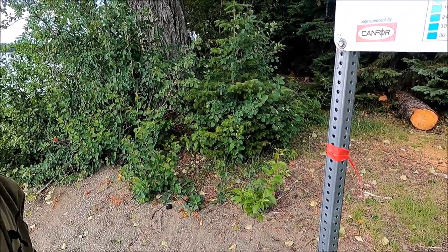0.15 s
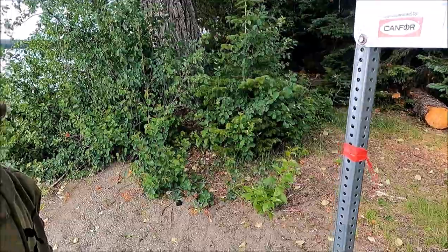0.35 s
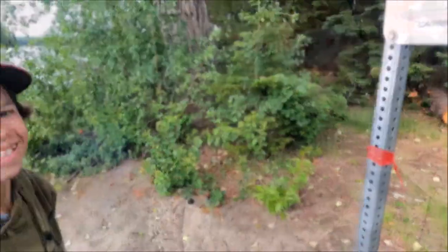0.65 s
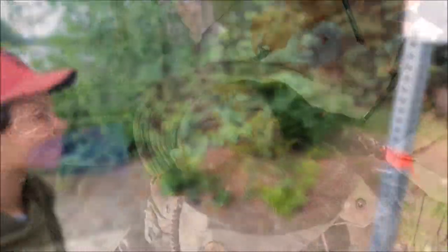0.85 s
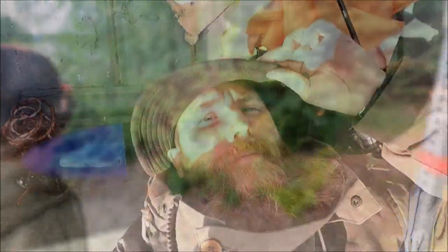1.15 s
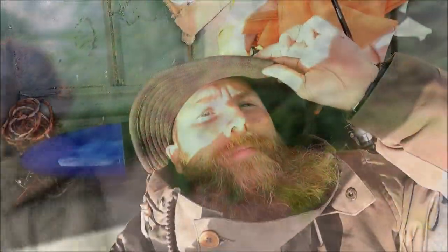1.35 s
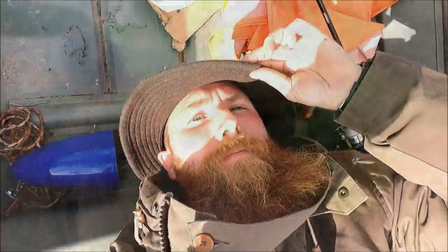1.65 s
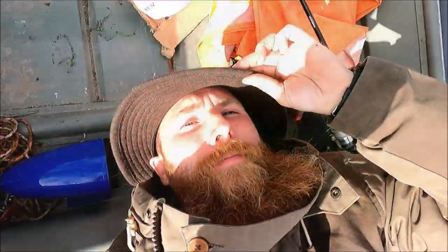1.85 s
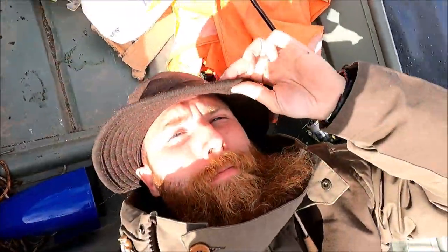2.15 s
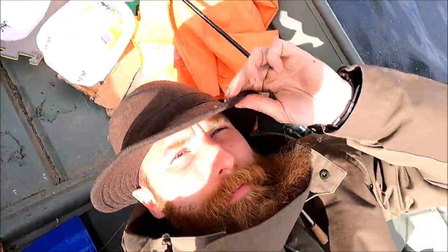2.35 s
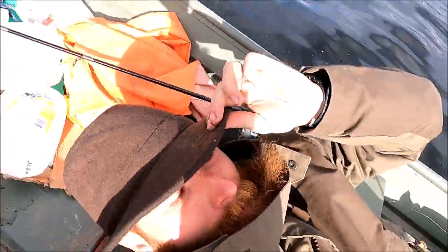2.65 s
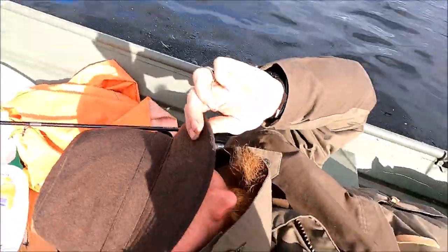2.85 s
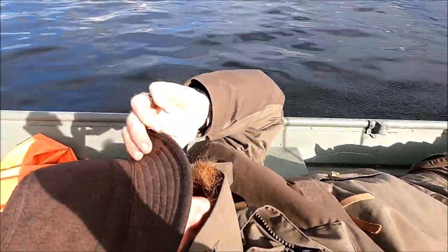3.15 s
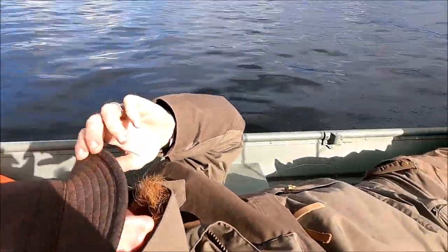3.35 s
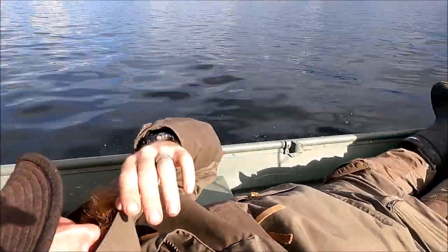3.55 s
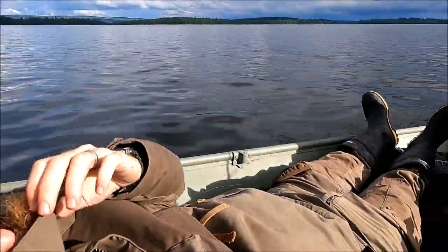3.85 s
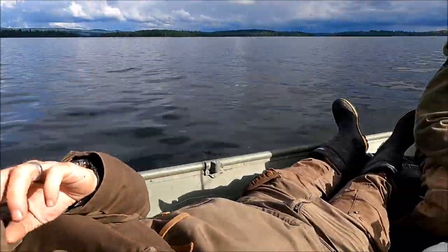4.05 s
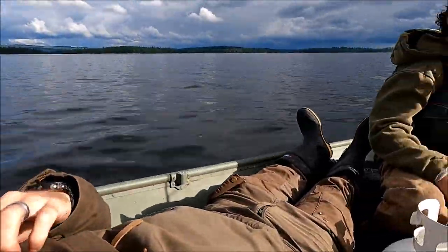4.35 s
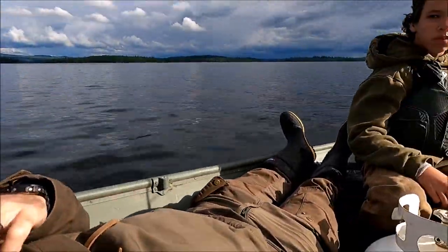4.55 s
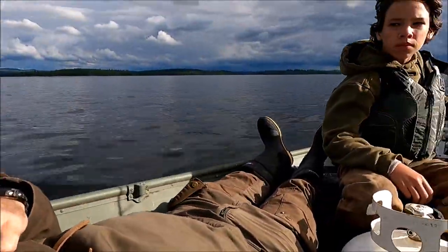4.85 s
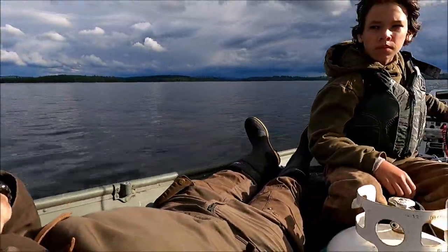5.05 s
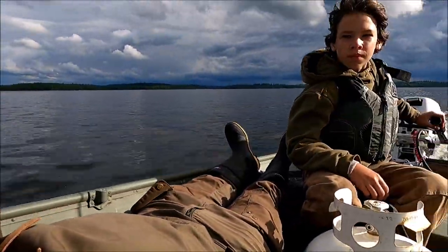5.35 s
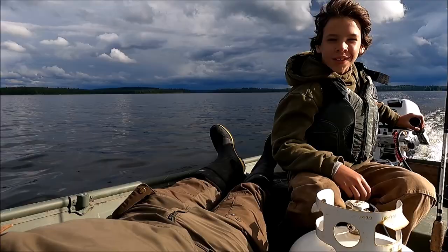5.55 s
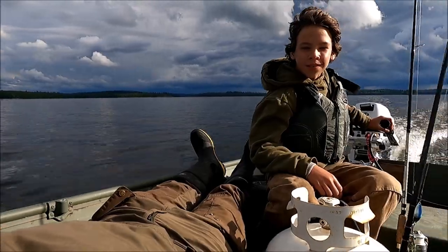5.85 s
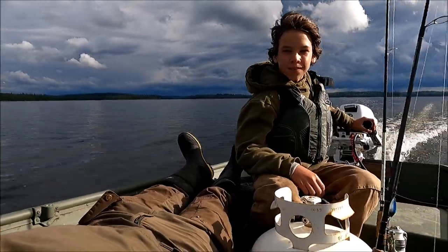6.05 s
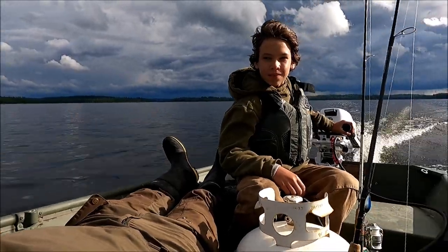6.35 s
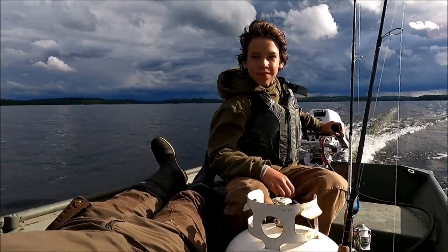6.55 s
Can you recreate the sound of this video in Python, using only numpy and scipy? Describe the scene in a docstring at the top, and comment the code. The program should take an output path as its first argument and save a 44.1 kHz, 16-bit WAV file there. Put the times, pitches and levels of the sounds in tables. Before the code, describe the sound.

A small outboard motor fades in after a brief, quiet moment of leaf rustle and light scuffs. Heard from aboard a metal boat on a lake, it drones at a steady pitch with fast ticking, swelling as the microphone swings round to the stern. Beneath it run a foamy wash, occasional hollow slaps on the hull and light spray, while low gusts buffet the microphone more often in the second half.

```python
"""Faint air in leaves and a few scuffs on a wooded shore give way to a ride in a small metal boat.
A single-cylinder four-stroke outboard holds its speed: each firing thumps, the hull drones, and
valves and gears clatter, all swelling as the microphone turns to face the motor.
Foam and bubbles wash along the side, wavelets slap the hull, spray patters on to the lake
and wind bumps the microphone."""
import sys
import numpy as np
from scipy import signal
from scipy.fft import rfft, irfft
from scipy.io import wavfile

SR = 44100
rng = np.random.default_rng(int(sys.argv[2]) if len(sys.argv) > 2 else 0)


def dump(signal):
    """Clip the signal to [-1, 1] and save it as 16-bit WAV at the path in sys.argv[1]."""
    limited = np.clip(np.atleast_2d(signal).T, -1, 1)
    pcm = np.round(limited * 32767).astype(np.int16)
    wavfile.write(sys.argv[1], SR, pcm)


N = 295818
TIME = np.arange(N) / SR

# Each row: time in seconds, firings per second. The throttle is held; the speed hunts a little.
FIRING_RATE = [(1, 41.93), (2, 41.95), (3, 42.0), (4, 41.96), (4.7, 41.91), (5.7, 41.9), (6.15, 41.84),
               (6.7, 41.91)]
# Each row: time in seconds, microphone heading
# (0 down into the boat, 1 over the side, 2 at the motor, 3 and up across the stern).
MIC_HEADING = [(1.5, 0), (2.4, 0.36), (3.3, 1.0), (3.9, 1.41), (4.6, 1.72), (5.2, 2), (5.6, 3), (6.1, 2.5),
               (6.71, 6.5)]
LOUDEST_HEADING = 2.29


def motor(base_db=-28, db_per_heading=2.5, exhaust_db=0.6, hull_db=-7.3, clatter_db=-27):
    """Exhaust note, hull drone and clatter; all swell as the microphone turns to the motor."""
    cycles = np.cumsum(curve(FIRING_RATE)) / SR + 0.0012 * drift(8.9)  # slight timing jitter
    heading = curve(MIC_HEADING)
    facing = np.minimum(heading, LOUDEST_HEADING)
    drone = hull_drone() * amp(hull_db + drift(3.5))
    metal = clatter(cycles, heading) * amp(clatter_db + (facing - 1.5) + drift(9))
    thumps = exhaust(cycles, heading) * amp(exhaust_db)
    return amp(base_db + db_per_heading * facing) * (thumps + drone + metal)


# Each row: multiple of the firing rate, then relative level in dB at headings 0, 1, 2 and 3.
EXHAUST_PARTIALS = [(1, -35, -35, -20, -18), (2, -7.5, -8, -3.5, -6.5), (3, -16.5, -11, -9, -7.5),
                    (4, -21, -20.5, -12.5, -11.5), (5, -10.5, -16, -12.5, -13), (6, -15, -13, -15.5, -16),
                    (7, -26.5, -16.5, -12, -9.5), (8, -18.5, -21.5, -8, -11), (9, -18.5, -23.5, -14, -17.5),
                    (10, -21.5, -15, -26, -20), (11, -29.5, -17, -41.5, -30.5),
                    (12, -34, -29, -37.5, -32.5), (13, -26, -27, -22.5, -19), (14, -22, -23, -20, -22),
                    (15, -32, -54.5, -38.5, -33.5), (16, -26.5, -50.5, -35.5, -26),
                    (17, -41.5, -64.5, -39.5, -38.5), (18, -54, -47, -29, -30.5),
                    (19, -25, -32.5, -33, -37), (20, -52.5, -45, -37.5, -43.5),
                    (25, -50, -28.5, -52, -51.5), (26, -31.5, -30, -28, -25),
                    (27, -30.5, -45.5, -36.5, -29.5), (28, -38, -30, -46, -45.5),
                    (29, -31, -46, -45.5, -51), (30, -38, -56, -30, -34.5), (31, -31, -42, -43, -34.5),
                    (32, -35, -37, -48, -35.5), (33, -34.5, -69.5, -51, -52), (48, -47, -59, -45.5, -51)]


def exhaust(cycles, heading, waver_db=0.8, waver_rad=0.07, spread_rad=0.04):
    """One thump per firing; the share of each partial depends on where the microphone points."""
    multiples, *views = np.transpose(EXHAUST_PARTIALS)
    orders = np.arange(1, 49)
    levels_db = np.array([np.interp(orders, multiples, view) for view in views])
    phases = panel_lag(orders * curve(FIRING_RATE).mean())
    phases -= spread_rad * orders ** 2  # the hull draws each thump out in time
    phases += (orders > 14) * 2 * np.pi * rng.random(len(orders))  # reflections scramble high partials
    note = np.zeros(N)
    for order, view_db, phase in zip(orders, levels_db.T, phases):
        # paths round the boat shift, so each partial wavers by itself
        gain = amp(np.interp(heading, np.arange(len(view_db)), view_db) + waver_db * drift(6.4))
        note += gain * np.cos(2 * np.pi * order * cycles + phase + waver_rad * drift(5.9))
    strength = 1 + 0.04 * rng.standard_normal(400)  # no two firings burn alike
    return np.sqrt(2) * note * np.interp(cycles, np.arange(len(strength)), strength)


# Each row: resonance of a hull panel in Hz, width in Hz.
PANEL_MODES = [(189, 42), (314, 11), (398, 14)]


def panel_lag(hz):
    """Phase in radians by which the ringing panels hold back partials at these frequencies."""
    return -sum(np.arctan2(width / 2, centre - hz) for centre, width in PANEL_MODES)


# Each row: frequency in Hz, relative level in dB.
HULL_SPECTRUM = [(30, -31.5), (55, -16.5), (85, 4.5), (130, -1), (220, 0), (330, -2.5), (450, -6.5),
                 (650, -11.5), (1000, -22), (2000, -72.5), (8000, -115)]


def hull_drone():
    """Low noise of the metal hull, stirred by the motor."""
    return colour(rng.standard_normal(N), HULL_SPECTRUM)


# Each row: frequency in Hz, relative level in dB.
CLATTER_SPECTRUM = [(500, -9), (1150, 7), (1500, 3.5), (2000, 8), (2600, 3.5), (3300, -4), (4150, 0),
                    (4700, 2), (5200, -2.5), (6000, -4.5), (6700, -8), (8400, -14.5), (9500, -26.5),
                    (12500, -41), (16000, -66)]


def clatter(cycles, heading, tick_share=0.44, ring_s=0.0025, play_cycles=0.0012):
    """Valves and gears tick at nearly the same crank angles each cycle, with a puff of hiss."""
    firings, lag = np.arange(int(cycles[-1])), np.arange(600)
    ticks = np.zeros(N + len(lag))
    for angle, size in rng.random((48, 2)):
        hit_cycles = firings + angle + play_cycles * rng.standard_normal(len(firings))
        starts = np.interp(hit_cycles, cycles, np.arange(N)).astype(int)
        ring = rng.standard_normal(len(lag)) * np.exp(-lag / SR / ring_s)  # each part has its own ring
        strengths = (size - 0.5) * (1 + 0.65 * rng.standard_normal(len(starts)))
        ticks[starts[:, None] + lag] += np.outer(strengths, ring)
    valve_pulse = 1 + 0.15 * np.cos(2 * np.pi * (cycles - 0.3))
    rattle = tick_share * unit(ticks[:N]) + (1 - tick_share) * rng.standard_normal(N)
    direct = colour(valve_pulse * rattle, CLATTER_SPECTRUM)
    return shadow(cowl(direct, heading), heading)


# Each row: resonance in Hz, width in Hz, height in dB over the side, height in dB facing the motor.
COWL_MODES = [(2300, 60, 3, 4.5), (2910, 130, 11.5, -1.5), (3770, 50, 6.5, 10), (4090, 72, 3, 6),
              (5470, 450, -1.5, 5), (6500, 680, 4.5, 6)]


def cowl(x, heading):
    """The thin shell round the engine rings; which resonances stand out depends on the heading."""
    f = np.fft.rfftfreq(N, 1 / SR)
    hz, width, *heights_db = np.transpose(COWL_MODES)
    peaks = 1 / (1 + (2 * (f[:, None] - hz) / width) ** 2)
    side, facing = (irfft(rfft(x) * amp(peaks @ db), N) for db in heights_db)
    aft = np.clip(heading - 1, 0, 1)
    return ((1 - aft) * side + aft * facing) / facing.std()


def shadow(x, heading, cutoff_hz=4800, leak=0.4):
    """Most of the treble is lost until the microphone faces the motor."""
    dull = signal.sosfiltfilt(signal.butter(2, cutoff_hz, fs=SR, output="sos"), x)
    return dull + (x - dull) * np.interp(heading, [1, 2], [leak, 1])


# Wash beside the hull and wake astern. Each row: frequency in Hz, relative level in dB.
WASH_SPECTRUM = [(200, 2), (600, 1), (900, 2.5), (1250, 0.5), (1900, -4), (2650, -10), (2900, -7),
                 (3250, -8), (4100, -11), (5000, -16.5), (6600, -27), (8000, -31.5), (10000, -42),
                 (12500, -66), (16000, -88.5)]
WAKE_SPECTRUM = [(200, -3), (650, 7), (900, 5), (1200, 4.5), (1550, -3), (1950, -4), (2650, -12),
                 (2950, -8.5), (3300, -11.5), (4200, -13.5), (5000, -28.5), (6600, -24), (8000, -22),
                 (10000, -33), (12500, -52), (16000, -78)]


def water(wash_db=4.5, wake_db=3.5, foam_db=6, flutter_db=1.8, bubbles_per_s=2000):
    """Foam with short ringing bubbles; the wash gives way to the wake as the microphone turns aft."""
    bubbles = np.zeros(N)
    pitches_hz = np.geomspace(700, 8000, 24)
    for hz in pitches_hz:
        t = np.arange(int(8 * SR / hz)) / SR
        ring = hz * np.sin(2 * np.pi * hz * t) * np.exp(-hz * t / 3.6)
        hits = rng.random(N) < bubbles_per_s / len(pitches_hz) / SR
        sizes = amp(0.5 * np.minimum(rng.exponential(1, N), 5))
        bubbles += signal.oaconvolve(hits * sizes, ring)[:N]
    froth = unit(bubbles) + rng.standard_normal(N) * amp(foam_db + flutter_db * drift(16))
    wash = amp(wash_db) * colour(froth, WASH_SPECTRUM)
    wake = amp(wake_db) * colour(froth, WAKE_SPECTRUM)
    aft = np.clip(curve(MIC_HEADING) - 1, 0, 1)
    return water_gain() * ((1 - aft) * wash + aft * wake)


def water_gain(steady_db=-47.5, over_side_db=1.5, ripple_db=0.14):
    """The water ripples, is loudest over the side and surges at each wavelet."""
    over_side = np.clip(1 - abs(curve(MIC_HEADING) - 1), 0, 1)
    steady = amp(steady_db + over_side_db * over_side + ripple_db * drift(21))
    return np.sqrt(steady ** 2 + surge_power(WAVELETS, rise=0.95))


# Each row: peak time in seconds, level in dB, length in seconds, slap pitch in Hz.
WAVELETS = [(1.655, -51.5, 0.015, 1400), (1.905, -54, 0.038, 1200), (2.38, -50, 0.041, 1500),
            (2.511, -45, 0.013, 1400), (3.012, -44, 0.025, 1250), (3.059, -41, 0.016, 1350),
            (3.433, -45.5, 0.071, 1010), (3.8, -50, 0.36, 1070), (5.357, -51, 0.1, 1560),
            (5.583, -51, 0.03, 1500), (5.852, -48, 0.059, 1830), (5.936, -44, 0.033, 800),
            (6.23, -46.5, 0.15, 1110), (6.653, -45.5, 0.051, 1000)]


def slaps(width_hz=650, gurgle_db=1):
    """Each wavelet smacks the hull with a hollow gurgle at its own pitch."""
    smacks = np.zeros(N)
    for peak_s, db, length_s, hz in WAVELETS:
        hollow = unit(bandpass(rng.standard_normal(N), hz, width_hz))
        smacks += hollow * np.sqrt(surge_power([(peak_s, db, length_s)], rise=0.83))
    return smacks * amp(gurgle_db * drift(60))


# Each row: peak time in seconds, level in dB, length in seconds.
SPRAY_SHEETS = [(2.39, -54, 0.047), (2.512, -52, .018), (3.01, -59, .022), (3.06, -52, 0.011),
                (3.5, -53.5, 0.14), (3.92, -52, .1), (4.36, -51.5, 0.018), (5.3, -58.5, 0.21),
                (5.85, -54, 0.032)]
# Each row: frequency in Hz, relative level in dB.
SPRAY_SPECTRUM = [(800, -23.5), (1800, 3.5), (3000, 1.5), (4500, -5), (6200, -13.5), (7500, -22.5),
                  (10000, -32.5), (12500, -53.5), (16000, -72)]


def spray(patter_db=4, patter_hz=90):
    """Sheets of fine drops thrown up beside the hull patter back on to the lake."""
    patter = rng.standard_normal(N) * amp(patter_db * drift(patter_hz))
    return colour(patter, SPRAY_SPECTRUM) * np.sqrt(surge_power(SPRAY_SHEETS, rise=1.1))


# Each row: peak time in seconds, level in dB, length in seconds.
WIND_GUSTS = [(1.8, -31, 0.046), (3.83, -42, 0.046), (4.05, -27, 0.11), (4.25, -27.5, 0.042),
              (4.78, -39, .07), (4.98, -28.5, .05), (5.26, -30.5, .05), (5.52, -28, 0.065),
              (5.86, -29.5, 0.13), (6.27, -28, 0.032), (6.52, -36, .06), (6.67, -26, 0.068)]
# Each row: frequency in Hz, relative level in dB.
WIND_SPECTRUM = [(8, -0.5), (22, -10), (45, -7.5), (70, -6.5), (120, -18.5), (300, -40), (1000, -96)]


def wind(breeze_db=-38, db_per_heading=2, lumps_db=1.5, lumps_hz=8.1):
    """Low lumps of turbulence on the microphone: a steady breeze with gusts."""
    exposure = np.minimum(curve(MIC_HEADING), LOUDEST_HEADING)
    breeze = amp(breeze_db + db_per_heading * exposure + lumps_db * drift(lumps_hz))
    rumble = colour(rng.standard_normal(N), WIND_SPECTRUM)
    return rumble * np.sqrt(breeze ** 2 + surge_power(WIND_GUSTS, rise=0.61))


# Each row: frequency in Hz, relative level in dB.
LEAF_AIR_SPECTRUM = [(15, 2), (90, -2), (250, -3), (500, -7), (800, -9), (1200, -13), (1700, -14),
                     (3300, -17), (5000, -22), (8000, -32), (11000, -45), (15000, -48)]
# Each row: start in seconds, peak level in dB, centre in Hz, width in Hz, decay in seconds.
SHORE_SCUFFS = [(0.02, -45.5, 50, 60, 0.012), (.04, -51, 218, 300, 0.074), (.08, -53.5, 950, 900, 0.054),
                (.219, -49, 249, 300, 0.0054), (0.3545, -42, 1570, 560, 0.0026),
                (0.439, -53, 1320, 400, .005), (.478, -51, 1160, 450, 0.011), (.507, -48, 1160, 736, 0.071),
                (0.508, -48, 127, 150, 0.011), (.535, -54, 179, 253, 0.052), (.585, -52, 656, 710, 0.36)]


def shore(air_db=-62):
    """Faint air in the leaves, with small ticks, scuffs and soft bumps."""
    return colour(rng.standard_normal(N), LEAF_AIR_SPECTRUM) * amp(air_db) + bursts(SHORE_SCUFFS)


# Each row: start in seconds, peak level in dB.
DROPLET_TICKS = [(0.176, -66), (0.403, -55), (0.945, -72), (1.079, -76), (1.513, -72), (1.847, -73),
                 (4.924, -68), (5.794, -76)]


def droplets(centre_hz=12000, width_hz=7000, decay_s=0.0016):
    """Fine bright ticks, like tiny drops."""
    return bursts([(start_s, db, centre_hz, width_hz, decay_s) for start_s, db in DROPLET_TICKS])


def bursts(rows):
    """Short dying puffs of band-limited noise, one per row."""
    puffs, t = np.zeros(N), np.arange(SR // 4) / SR
    for start_s, peak_db, hz, width_hz, decay_s in rows:
        puff = bandpass(rng.standard_normal(len(t)) * np.exp(-t / decay_s), hz, width_hz)
        start = round(start_s * SR)
        puffs[start:start + len(t)] += amp(peak_db) * puff / abs(puff).max()
    return puffs


def surge_power(rows, rise):
    """Summed power of surges; each builds over rise times its length and dies over its length."""
    power = np.zeros(N)
    for peak_s, db, length_s, *_ in rows:
        age = (TIME - peak_s) / length_s
        power += amp(db) ** 2 * np.exp(-np.where(age < 0, age / rise, age) ** 2)
    return power


def amp(db):
    """Decibels to gain."""
    return 10 ** (np.asarray(db) / 20)


def unit(x):
    """Scales to rms 1."""
    return x / np.sqrt(np.mean(x ** 2) + 1e-20)


def curve(rows):
    """Joins (seconds, value) rows by straight lines."""
    return np.interp(TIME, *np.transpose(rows))


def colour(x, spectrum):
    """Filters x by (Hz, dB) rows and scales to rms 1."""
    hz, db = np.transpose(spectrum)
    f = np.fft.rfftfreq(N, 1 / SR)
    gain = amp(np.interp(np.log(f + 1), np.log(hz), db))
    return unit(irfft(rfft(x) * gain, N))


def drift(rate_hz):
    """Random wandering below about rate_hz, rms 1."""
    f = np.fft.rfftfreq(4096, 1 / 500)
    slow = irfft(rfft(rng.standard_normal(4096)) * (f > 0) / (1 + (f / rate_hz) ** 4))
    return unit(np.interp(TIME, np.arange(len(slow)) / 500, slow))


def bandpass(x, hz, width_hz):
    """Keeps a band of this width round hz."""
    edges = np.clip([hz - width_hz / 2, hz + width_hz / 2], 10, SR / 2 - 10)
    return signal.sosfilt(signal.butter(3, edges, "band", fs=SR, output="sos"), x)


def scene(board_s=0.768, cut_in_s=0.06, first_gain=0.19, fade_up_s=1.14):
    """The shore fades out; the boat cuts in at part gain, then fades up to full."""
    ashore = curve([(0.8, 1), (1.5, 0)])
    aboard_s = TIME - board_s
    aboard = np.clip(aboard_s / cut_in_s, 0, 1) * np.interp(aboard_s, [0, fade_up_s], [first_gain, 1])
    background = ashore * shore() + droplets()
    boat = motor() + water() + slaps() + spray() + wind()
    return (background + aboard * boat)[None]


def record(dry, cutoff_hz=15800, stop_s=0.005):
    """A soft stop and a steep treble limit."""
    stop = np.clip((TIME[-1] - TIME) / stop_s, 0, 1)
    return signal.sosfilt(signal.butter(12, cutoff_hz, fs=SR, output="sos"), dry * stop)


dry = scene()
out = record(dry)
dump(out)
```